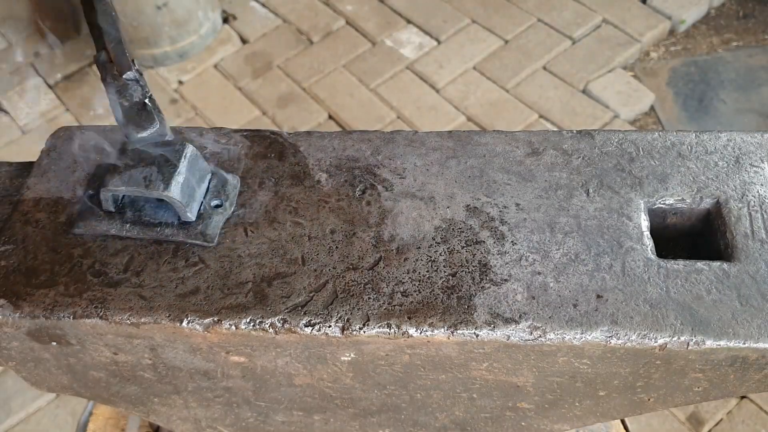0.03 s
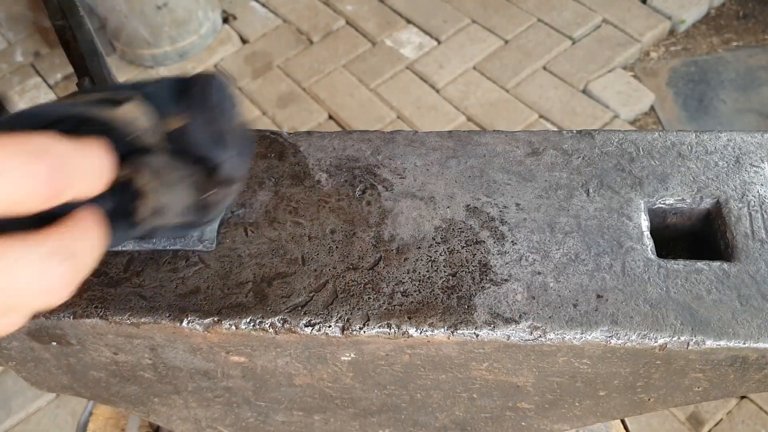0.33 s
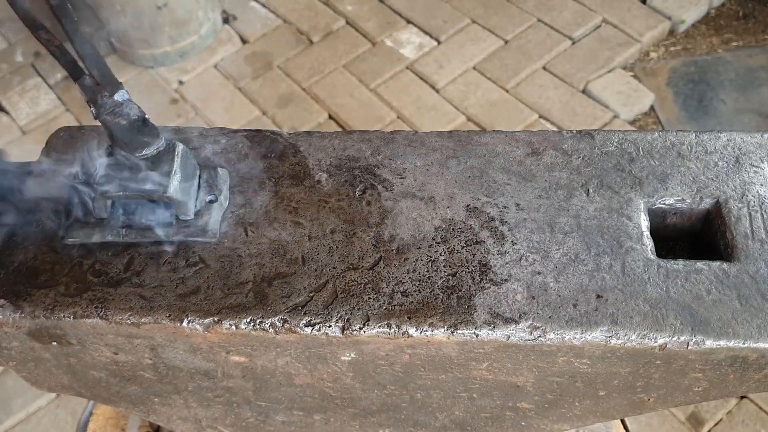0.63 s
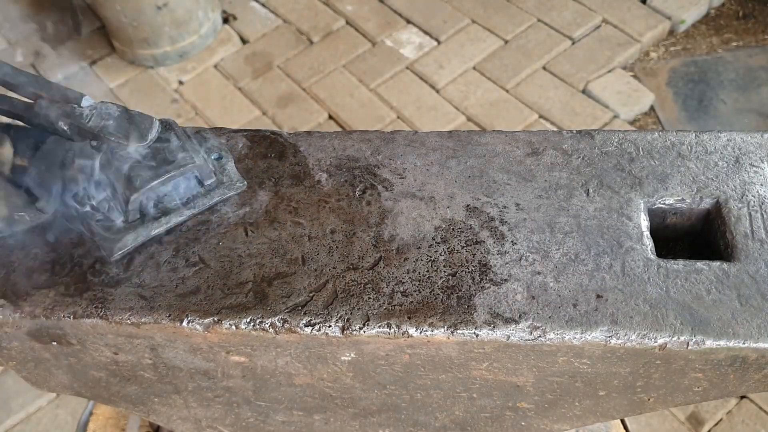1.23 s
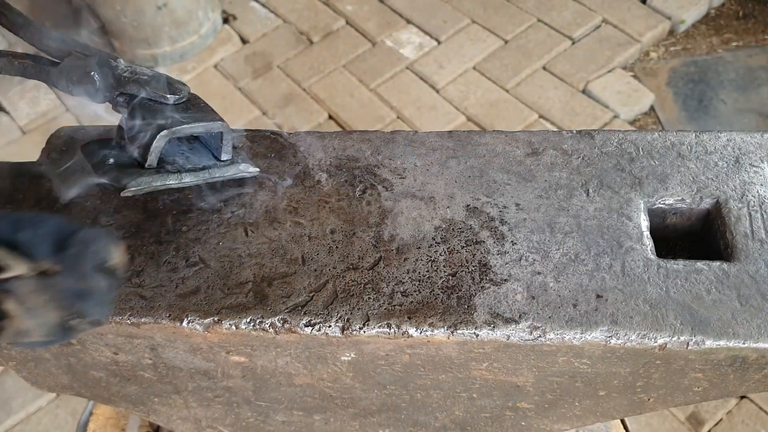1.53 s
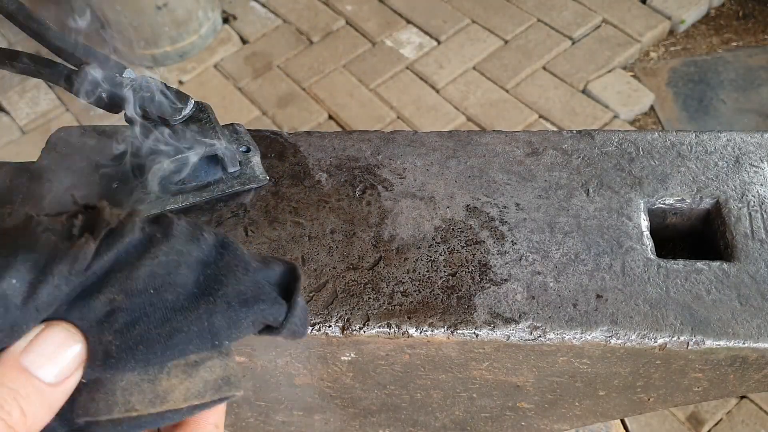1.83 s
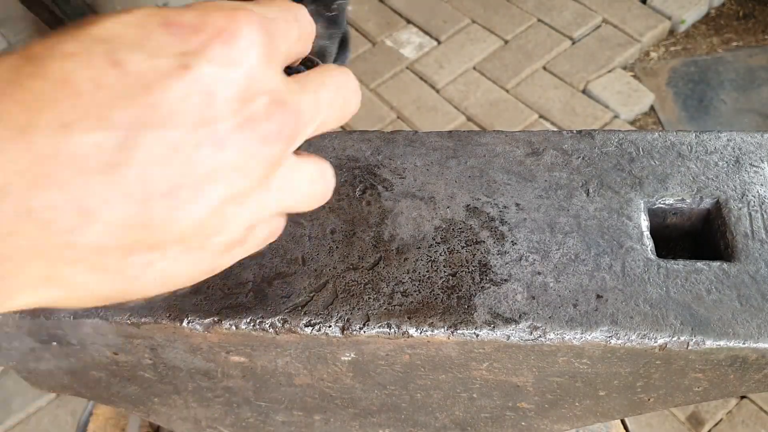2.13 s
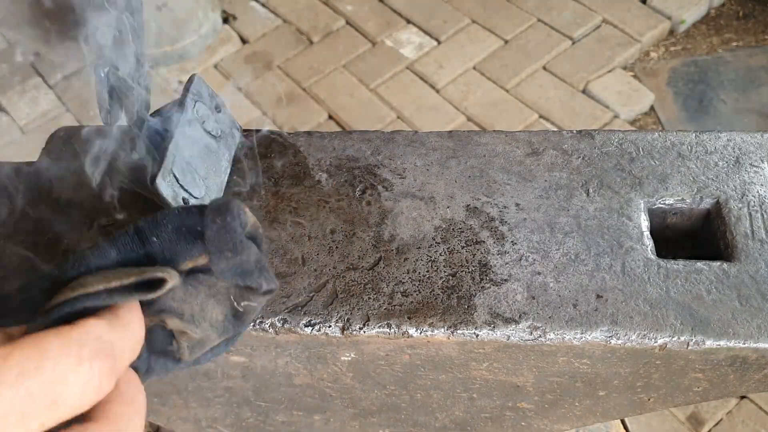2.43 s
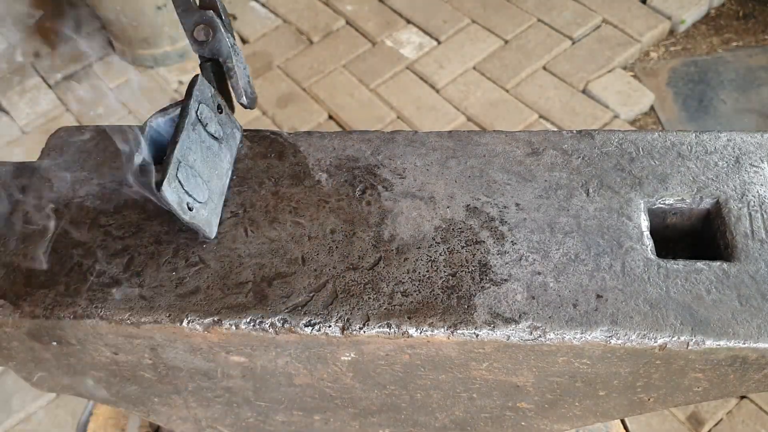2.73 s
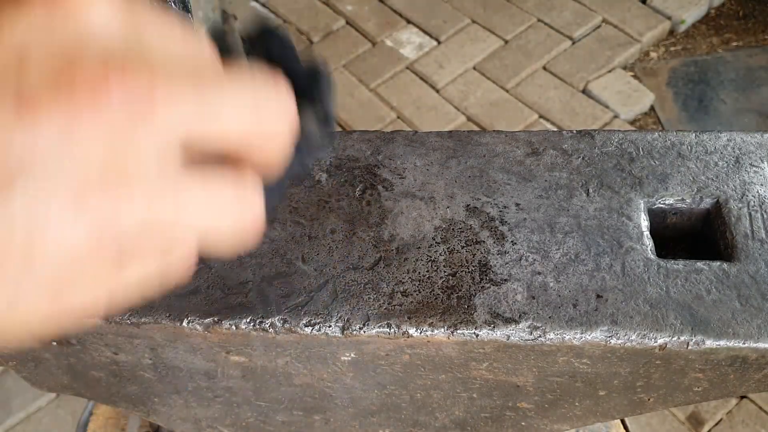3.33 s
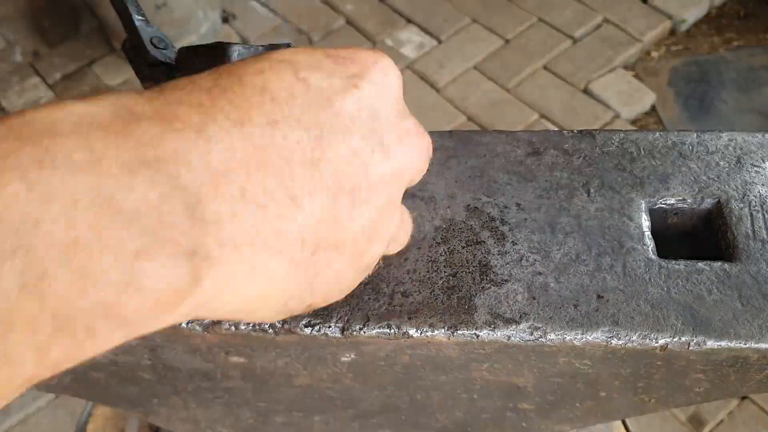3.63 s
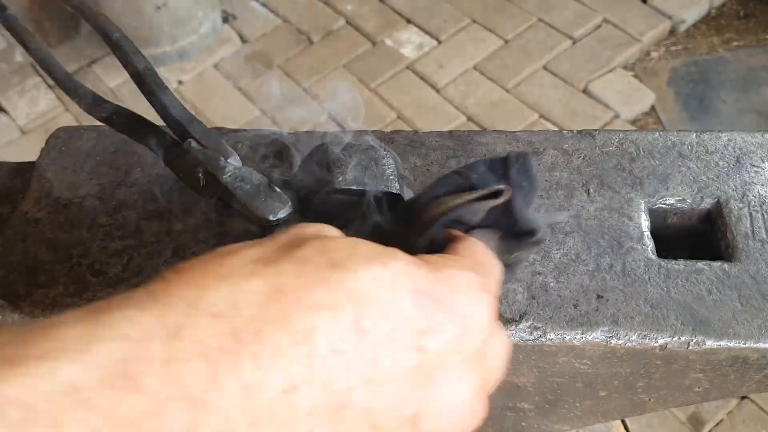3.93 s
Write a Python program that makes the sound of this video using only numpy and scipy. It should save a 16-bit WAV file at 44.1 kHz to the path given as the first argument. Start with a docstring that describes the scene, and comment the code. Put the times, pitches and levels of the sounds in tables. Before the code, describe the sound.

A forge blower roars steadily in a workshop, with a thin hiss on top. Past the middle, a steel piece held in tongs scrapes and ticks lightly on an anvil close to the microphone, then clinks once more.

```python
"""A forge blower roars steadily in a workshop: turbulent air sounds through fixed resonances,
over a thin hiss. Close by, a hot steel piece held in tongs is wiped with a rag on an anvil.
The moving rag pushes faint puffs of air; the piece scrapes on the anvil face, and steel
ticks lightly against steel."""
import sys
import numpy as np
from scipy.fft import rfft, irfft, next_fast_len
from scipy.io import wavfile
from scipy.ndimage import map_coordinates

SR = 44100
rng = np.random.default_rng(int(sys.argv[2]) if len(sys.argv) > 2 else 0)


def master(y):
    """Save y as 16-bit WAV."""
    cut = np.clip(np.atleast_2d(y).T, -1, 1)
    pcm = np.round(cut * 32767)  # scale
    wavfile.write(sys.argv[1], SR, pcm.astype(np.int16))


N = 176400


def amp(db):
    """Decibels to gain."""
    return 10 ** (np.asarray(db) / 20)


def unit_rms(x):
    """Scale to rms 1."""
    return x / np.sqrt(np.mean(x ** 2) + 1e-20)


def log_interp(points, hz):
    """Interpolate (freq_hz, value) points on a log axis."""
    freqs, values = np.transpose(points)
    return np.interp(np.log(hz + 1), np.log(freqs + 1), values)


def pan(pan_db):
    """Stereo gains; pan_db is left minus right."""
    return amp(np.array([[pan_db], [-pan_db]]) / 2)


def wobble(rate_hz):
    """Smooth random curve, rate_hz knots a second."""
    knots = rng.standard_normal(int(N * rate_hz / SR) + 4)
    return map_coordinates(knots, [np.arange(N) * rate_hz / SR])


def filtered(x, response):
    """Apply the frequency response response(hz)."""
    size = next_fast_len(N + SR // 2)
    hz = np.fft.rfftfreq(size, 1 / SR)
    return irfft(rfft(x, size) * response(hz), size)[..., :N]


def noise(spectrum):
    """Two independent coloured noises, rms 1."""
    white = rng.standard_normal((2, N))
    return unit_rms(filtered(white, lambda hz: amp(log_interp(spectrum, hz))))


def swell(start_s, length_s):
    """Half-sine envelope."""
    return np.sin(np.pi * np.clip((np.arange(N) / SR - start_s) / length_s, 0, 1))


# Broad rush of air: freq_hz, level_db
RUSH_SPECTRUM = [(20,-100),(75,-102),(130,-78.5),(600,-75),(2000,-72),(3000,-73),(4500,-83),(6700,-85),(8600,-87.5),(12000,-90.5),(12700,-90.5),(15700,-101.5)]
# Forge and room resonances: centre_hz, width_hz, level_db, pan_db
FORGE_RESONANCES = [(201,42,-64.5,0.5),(286,58,-53.7,-0.3),(386,40,-61.5,0.5),(492,40,-57,-1),(634,34,-63,-0.4),(742,43,-51,0.9),
                    (788,40,-51.8,0.5),(883,31,-65.5,0),(967,60,-54.5,1),(1115,60,-59.5,7.5),(1228,57,-56.2,3.5),(1312,52,-58.5,2),
                    (1376,55,-49,0),(1515,40,-52.5,0.5),(1638,62,-56.8,-2),(1805,44,-56.8,13),(1842,45,-53.8,3),(1936,44,-55.7,6),
                    (2068,50,-63.3,3),(2218,58,-62.5,10),(2342,60,-64.3,0),(2468,46,-62,4),(2597,48,-60,3),(2685,46,-67.5,3.2),
                    (2758,52,-63.7,7),(2848,66,-66,-1),(3200,110,-75.5,3),(3590,110,-73,1.5),(3870,190,-69.5,3),(4010,120,-76.5,0),
                    (4230,170,-77.5,-3),(4565,90,-77,2),(5350,800,-84.5,2.5),(7330,290,-81.5,1),(9290,130,-79.8,3),(9850,400,-83,3),
                    (11400,700,-87.3,4),(14150,700,-88.8,3)]


def forge_colour(hz, bass_cut_hz=95):
    """Gain per ear: steep resonances on the broad rush, with little deep bass."""
    power = (amp(log_interp(RUSH_SPECTRUM, hz)) * pan(1.5)) ** 2
    for centre_hz, width_hz, level_db, pan_db in FORGE_RESONANCES:
        bell = 1 / (1 + ((hz - centre_hz) / width_hz) ** 2)
        power += (amp(level_db) * pan(pan_db)) ** 2 * bell ** 3
    highpass = hz ** 2 / np.hypot(hz ** 2, bass_cut_hz ** 2)
    return np.sqrt(power * SR / 2) * highpass


# Fine random peaks and dips: freq_hz, depth_db
RIPPLE_DEPTH = [(2900,0.3),(3600,1.2),(5500,2),(7500,3),(14000,3)]
# Cancelling reflections: centre_hz, width_hz, depth_db
ROOM_NOTCHES = [(685,9,5),(838,13,6),(1045,13,6),(1180,12,2),(1455,12,3),(1730,15,6),(1895,10,2),(2280,14,4),(2410,15,4),(4440,45,3),(4720,50,3),(6850,170,3),(8980,80,4)]


def treble_ripple(hz, step_hz=40):
    """Fine peaks and dips make the hiss faintly tonal at each ear; both ears share the notches."""
    knots = rng.standard_normal((2, SR // step_hz))
    ripple = np.array([map_coordinates(ear, [hz / step_hz]) for ear in knots])
    notch_db = sum(depth_db * np.exp(-((hz - centre_hz) / width_hz) ** 2)
                   for centre_hz, width_hz, depth_db in ROOM_NOTCHES)
    return amp(log_interp(RIPPLE_DEPTH, hz) * ripple - notch_db)


# Phase scatter between the ears: freq_hz, spread_rad
EAR_PHASE_SPREAD = [(300,0.03),(900,0.12),(1400,0.18),(2000,0.3),(3000,0.45),(4500,1),(7000,1.2),(15000,1.2)]


def ear_phase(hz, step_hz=130, left_lead_s=0.00004):
    """Reflections reach the ears out of step, more so for short waves."""
    knots = rng.standard_normal(SR // step_hz)
    scatter_rad = log_interp(EAR_PHASE_SPREAD, hz) * map_coordinates(knots, [hz / step_hz])
    angle_rad = scatter_rad + 2 * np.pi * hz * left_lead_s
    return np.exp(0.5j * np.array([angle_rad, -angle_rad]))


# Left-right likeness of the roar: freq_hz, coherence
ROAR_COHERENCE = [(60,0.8),(150,0.98),(290,0.995),(800,0.99),(1400,0.96),(2000,0.82),(3100,0.62),(4500,0.5),(7000,0.42),(15000,0.42)]


def forge_blower():
    """Fluttering turbulence drives the resonances; the bass is near mono, the hiss wide."""
    def mid_side_gains(hz):
        angle_rad = np.arccos(log_interp(ROAR_COHERENCE, hz)) / 2
        return np.array([np.cos(angle_rad), np.sin(angle_rad)])

    mid, side = filtered(rng.standard_normal((2, N)), mid_side_gains)
    flutter_db = -0.1 + 0.6 * wobble(rate_hz=24)
    turbulence = amp(flutter_db) * np.array([mid + side, mid - side])
    return filtered(turbulence, lambda hz: forge_colour(hz) * treble_ripple(hz) * ear_phase(hz))


# Air pushed by the rag: middle_s, length_s, level_db
RAG_SWEEPS = [(.8,.06,-63),(.91,.07,-63),(1.1,.09,-65),(1.53,.07,-62),(1.67,.14,-56),(2.413,0.1,-55),(2.78,.08,-66),(3.45,.07,-64),(3.75,.07,-64),(3.9,0.13,-58)]
# Puff colour: freq_hz, level_db
PUFF_SPECTRUM = [(15,-10),(35,-2),(70,-3),(130,-1),(400,-40),(2000,-100)]


def rag_puffs(side_gain=0.3):
    """The passing rag pushes soft low puffs, slightly different at each ear."""
    mid, side = noise(PUFF_SPECTRUM)
    air = np.array([mid + side_gain * side, mid - side_gain * side])
    envelope = sum(amp(level_db) * swell(middle_s - length_s / 2, length_s)
                   for middle_s, length_s, level_db in RAG_SWEEPS)
    return air * envelope


# Steel sliding on the anvil: start_s, length_s, level_db
SLIDES = [(2.265,0.087,-41),(2.43,0.11,-60),(2.667,0.046,-45),(2.85,0.13,-48)]
# Friction colour: freq_hz, level_db
SCRAPE_SPECTRUM = [(2000,-22),(6000,-1.5),(10000,-10),(13500,0),(16000,-7)]


def anvil_scrapes(grit_db=2):
    """The piece drags briefly over the gritty anvil face."""
    friction = unit_rms(noise(SCRAPE_SPECTRUM) * amp(grit_db * wobble(rate_hz=700)))
    envelope = sum(amp(level_db) * swell(start_s, length_s) for start_s, length_s, level_db in SLIDES)
    return friction * envelope * pan(3)


# Steel touching steel: start_s, level_db, tilt_db_per_octave, t60_s, pan_db
CONTACTS = [(2.2757,-37,3,.07,6),(2.4222,-23,0,.045,2),(2.4715,-27,-1,0.055,4),(2.5065,-37,12,.07,2.5),(2.6805,-34,-4,0.045,0),(2.8809,-33,7,.06,4),(3.9125,-24,5,0.05,5)]
# Clink colour: freq_hz, level_db
CLINK_SPECTRUM = [(1000,-30),(4200,-4),(5700,-4),(8000,-9),(8600,0),(9700,4),(11500,-4),(13500,4),(16000,-2)]
# Ring of the steel: pitch_hz, level_db, t60_s
STEEL_MODES = [(5846,-1,.16),(7337,-10,.12),(8600,-3,.08),(9710,2,.09),(11400,-12,.1),(13110,-3,.06),(13700,-8,.06),(14860,-6,.07)]


def steel_ticks(crack_db=-12, crack_t60_s=0.005, ring_db=-20, scatter_db=2, pivot_hz=11000):
    """Each contact is a sharp crack, a short dense clink and a faint ring of the steel."""
    out = np.zeros((2, N + SR))
    t = np.arange(SR // 3) / SR
    hz = np.fft.rfftfreq(len(t), 1 / SR)
    passband = hz > CLINK_SPECTRUM[0][0]
    for start_s, level_db, tilt_db_per_octave, t60_s, pan_db in CONTACTS:
        tilt_db = lambda freq_hz: tilt_db_per_octave * np.log2((freq_hz + 1) / pivot_hz)
        colour = amp(log_interp(CLINK_SPECTRUM, hz) + tilt_db(hz)) * passband
        white = rng.standard_normal((2, len(t)))
        clink = unit_rms(irfft(rfft(white) * colour, len(t)))
        tick = clink * (amp(-60 * t / t60_s) + amp(crack_db - 60 * t / crack_t60_s))
        for pitch_hz, mode_db, mode_t60_s in STEEL_MODES:
            phase_rad = rng.uniform(0, 2 * np.pi, (2, 1))
            onset_db = ring_db + mode_db + tilt_db(pitch_hz) + scatter_db * rng.standard_normal()
            tick += amp(onset_db - 60 * t / mode_t60_s) * np.sin(2 * np.pi * pitch_hz * t + phase_rad)
        start = round(start_s * SR)
        out[:, start:start + len(t)] += amp(level_db) * pan(pan_db) * tick
    return out[:, :N]


def scene():
    """The forge behind, the handwork in front."""
    return forge_blower() + rag_puffs() + anvil_scrapes() + steel_ticks()


def record(dry):
    """Brick-wall lowpass."""
    cutoff_hz = 15850
    return filtered(dry, lambda hz: hz < cutoff_hz)


dry = scene()
out = record(dry)
master(out)
```